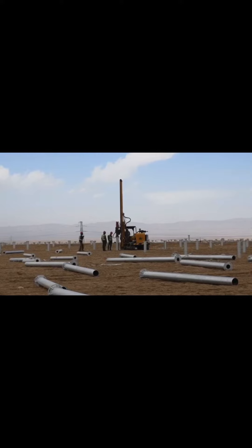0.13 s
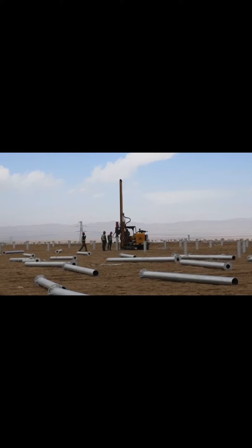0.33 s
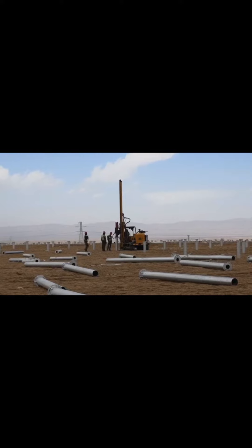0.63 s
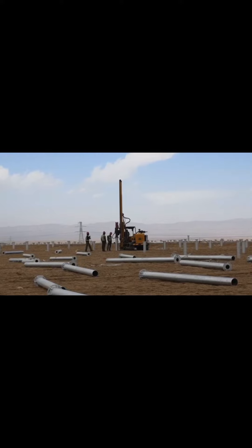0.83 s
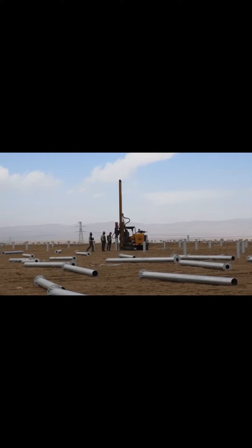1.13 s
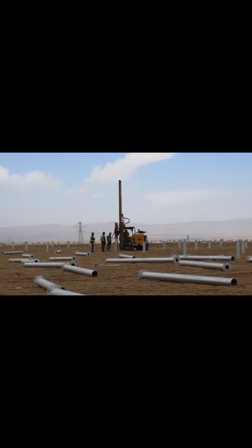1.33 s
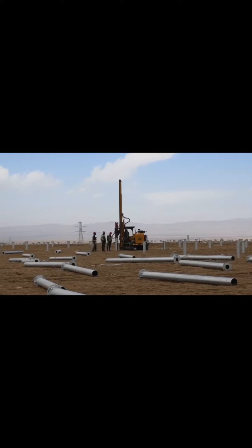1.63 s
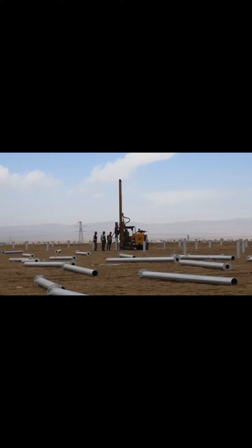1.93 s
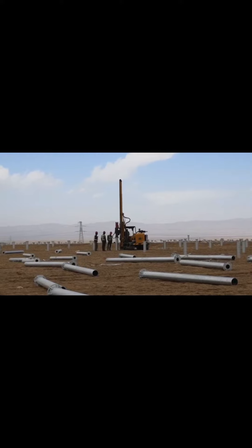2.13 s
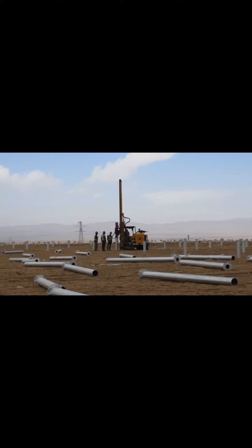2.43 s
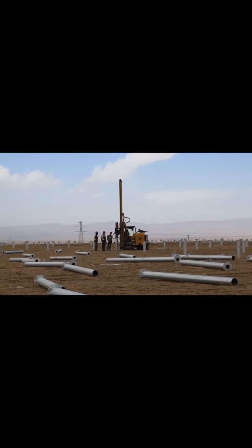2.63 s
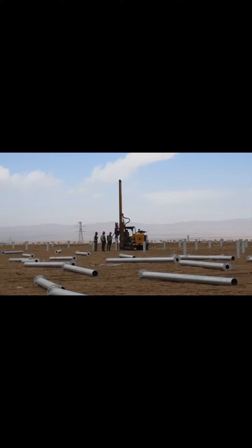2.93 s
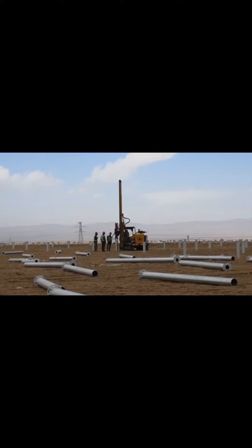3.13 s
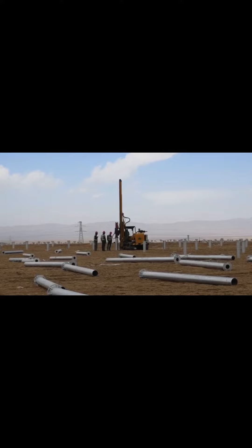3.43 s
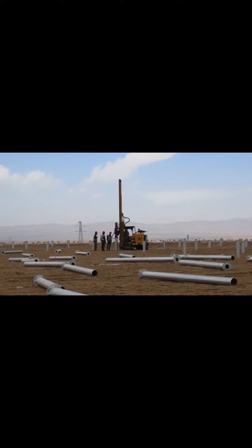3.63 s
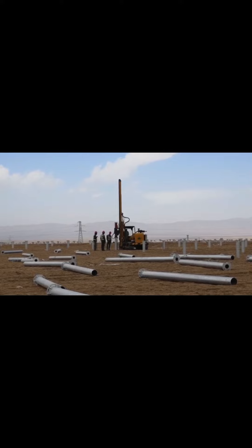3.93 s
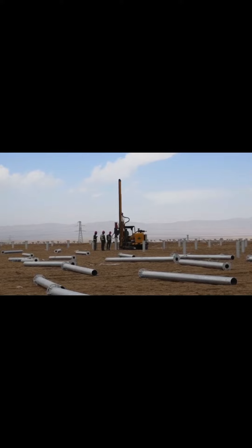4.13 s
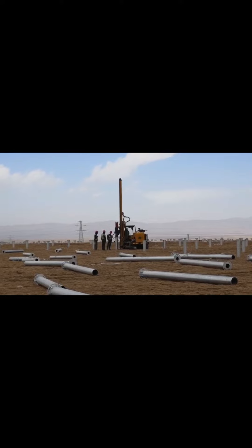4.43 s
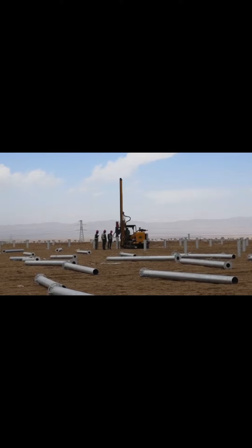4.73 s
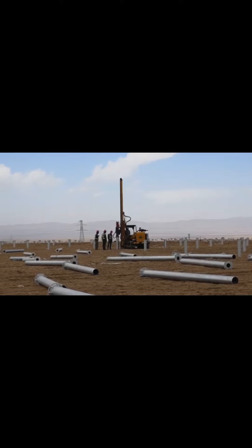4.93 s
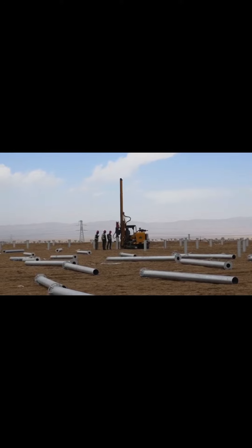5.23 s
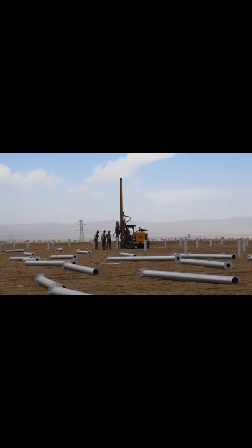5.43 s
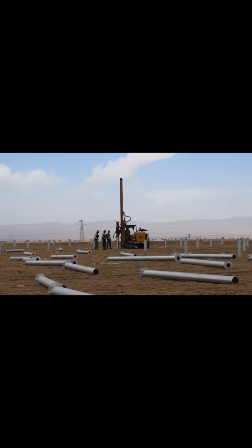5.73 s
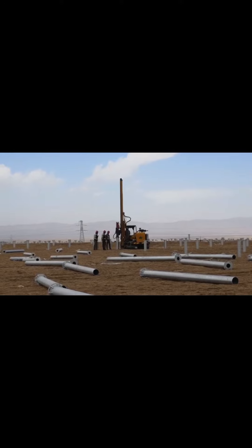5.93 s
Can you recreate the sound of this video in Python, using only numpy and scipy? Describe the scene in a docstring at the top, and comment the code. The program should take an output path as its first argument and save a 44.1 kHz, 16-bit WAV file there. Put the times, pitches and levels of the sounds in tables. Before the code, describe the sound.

Fast machine-gun-like steel clanging from a rig across an open field, faint engine hiss behind it, low wind thumping on a small camera's microphones.

```python
"""Pile driver across a windy field

Far across an open field a hydraulic hammer strikes a steel tube nearly ten times a second; its engine hisses.
A valve ticks just before each blow. Tube and valve are sums of decaying modes; clatter, echoes and engine are
shaped noise. Wind buffets the two microphone ports of a small camera: three bands of noise, swelling in gusts.
The microphone overloads softly and cuts the extreme treble."""
import sys
import numpy as np
from scipy import signal
from scipy.fft import irfft
from scipy.io import wavfile
from scipy.ndimage import uniform_filter1d

SR = 44100
rng = np.random.default_rng(int(sys.argv[2]) if len(sys.argv) > 2 else 0)


def transcribe(u):
    """Save the signal u as a 16-bit wav file named by the first command-line argument.

    u: samples, shape (n,) or (channels, n), limited to [-1, 1]; the rate is SR.
    q: integer samples, one column per channel.
    """
    v = np.clip(np.atleast_2d(u).T, -1, 1)
    q = np.round(v * 32767).astype(np.int16)
    wavfile.write(sys.argv[1], SR, q)


N = 268348


def gain_of(db):
    """dB to amplitude."""
    return 10 ** (np.asarray(db) / 20)


def evened(x):
    """Scales to rms 1."""
    return x / np.sqrt(np.mean(x ** 2) + 1e-20)


def read(points, hz, column=1):
    """Reads a table along log frequency."""
    points = np.transpose(points)
    return np.interp(np.log(hz + 1), np.log(points[0] + 1), points[column])


def wavering(seconds):
    """Slow random drift of rms 1, smoothed twice over the given time."""
    span = max(round(seconds * SR), 2)
    once = uniform_filter1d(rng.standard_normal(N), span)
    return evened(uniform_filter1d(once, span))


def pair_noise(spectrum, ports, balance_db, lead):
    """Partly alike noise at two microphone ports; the mean of both has rms 1."""
    hz = np.fft.rfftfreq(N, 1 / SR)
    a, b, c, d = rng.standard_normal((4, len(hz)))
    same = np.clip(ports(hz), -1, 1)
    right = a + 1j * b
    # the left port shares part of the right port's noise, turned by its lead
    left = (same * right + np.sqrt(1 - same ** 2) * (c + 1j * d)) * np.exp(1j * lead)
    both = np.array([left * gain_of(balance_db / 2), right * gain_of(-balance_db / 2)])
    pair = irfft(both * gain_of(read(spectrum, hz)), N)
    return pair / np.sqrt(np.mean(pair.mean(0) ** 2))


# how the two ports hear the distant machine: f/Hz, left-right level/dB, left lead/rad, likeness/0-1
PORTS = [(700, 0, 0, .6), (1300, -4, .2, .9), (2000, -8, .5, .9), (2600, 1.5, 1.1, .8), (3200, 0, 1.5, .7),
         (4100, 4, 3.7, .7), (4600, 5, 5.7, .6), (5600, 8, 8.1, .5), (6200, 6, 6.9, .5),
         (8000, 12, 7.8, .5), (9000, 2.5, 8.3, .5), (10500, 0, 9.4, .45)]


def far_noise(spectrum):
    """Noise from the distant machine: level, phase and likeness at the two ports vary with frequency."""
    hz = np.fft.rfftfreq(N, 1 / SR)
    balance_db, lead = read(PORTS, hz), read(PORTS, hz, column=2)
    return pair_noise(spectrum, lambda f: read(PORTS, f, column=3), balance_db, lead)


# spectrum shape of the engine hiss at the microphone: f/Hz, relative level/dB per Hz
ENGINE = [(350, -40), (600, -19.5), (1150, -12.5), (1400, -8.5), (1780, -9.5), (2080, -4.5), (2420, -12.5),
          (2900, -8.5), (3350, -25), (3700, -23), (4050, -8.5), (4320, -23.5), (4700, -20), (5700, -31),
          (7850, -26), (9000, -39), (12000, -44.5), (16000, -58)]


def engine():
    """Steady hiss behind the blows: noise in the engine's spectrum, heard from far off."""
    return gain_of(-49.5) * far_noise(ENGINE)


# wind at the two ports: f/Hz, likeness/0-1, left lead/rad
SAME = [(25, .98, -.15), (60, .96, -.2), (107, .8, 0), (150, .66, .4), (215, .5, .9), (300, .5, 1.9),
        (430, .64, 2.8), (600, .66, 3.1), (900, .5, 3.3)]


def port_wind(spectrum, balance_db):
    """Large eddies are alike at both ports; small ones differ more and reach one port first."""
    hz = np.fft.rfftfreq(N, 1 / SR)
    return pair_noise(spectrum, lambda f: read(SAME, f), balance_db, read(SAME, hz, column=2))


# wind strength before gusts and lumps: t/s, rumble level/dB, buffeting level/dB, flutter level/dB
WIND = [(0.1, -14.5, -27.5, -45), (0.28, -18, -21.5, -46), (0.43, -24, -28.5, -58), (0.49, -15, -23, -44.5),
        (0.76, -20, -25.5, -46.5), (0.84, -9, -21.5, -42), (0.9, -18.5, -22, -41), (1.32, -18, -25, -44),
        (1.46, -12.5, -22, -43.5), (1.58, -23.5, -30, -43), (1.59, -10, -25, -40),
        (1.92, -23.5, -22, -37.5), (2.02, -15, -20.5, -34.5), (2.24, -13, -23, -36.5),
        (2.48, -19, -25, -41.5), (2.51, -11.5, -18.5, -36.5), (2.63, -16.5, -23.5, -39.5),
        (2.76, -13, -22, -36.5), (3.65, -15, -22, -40), (3.93, -19.5, -28.5, -48.5),
        (4.03, -14.5, -20, -39.5), (4.21, -13.5, -21, -38.5), (4.47, -14.5, -24, -43.5),
        (4.82, -20.5, -29, -45.5), (4.85, -9.5, -15.5, -36), (4.93, -17, -35, -43),
        (4.98, -11, -17.5, -34.5), (5.16, -17, -22.5, -36), (5.85, -11.5, -22, -38),
        (6.0, -20.5, -15.5, -31.5)]
# spectrum shapes of the wind, large eddies to small: f/Hz, relative level/dB per Hz
RUMBLE = [(5, -13), (15, -0.5), (30, 4.5), (55, 8), (80, 2), (130, -5.5), (300, -51), (2000, -140)]
BUFFET = [(30, -2.5), (80, -18.5), (120, -5), (170, -5.5), (250, -12), (400, -23), (800, -97), (4000, -130)]
FLUTTER = [(100, -20), (250, 3.5), (400, 2.5), (560, -4), (800, -11), (1150, -23), (2500, -59.5),
           (8000, -120)]


def wind():
    """Eddies at the microphone: rumble swells with the gusts, buffeting and flutter also come in lumps."""
    s, *curves = np.transpose(WIND)
    t = np.arange(N) / SR
    rumble_db, buffet_db, flutter_db = (np.interp(t, s, curve) for curve in curves)
    lumps, spikes, gusts = wavering(0.011), wavering(0.0055), wavering(0.036)
    rumble_db = rumble_db + 0.93 * gusts
    buffet_db = buffet_db + 2.43 * lumps + 0.8 * gusts
    flutter_db = flutter_db + 2.03 * lumps + 3.1 * spikes + 2.22 * gusts
    rumble = port_wind(RUMBLE, balance_db=0) * gain_of(rumble_db)
    buffet = port_wind(BUFFET, balance_db=.4) * gain_of(buffet_db)
    flutter = port_wind(FLUTTER, balance_db=1.2) * gain_of(flutter_db)
    return rumble + buffet + flutter


def decays(times, db, t60, rise):
    """Envelope: every event swells with time constant `rise` (s) while dying 60 dB in t60 (s)."""
    kicks, t = np.zeros(N), np.arange(SR // 2) / SR
    kicks[np.round(times * SR).astype(int)] = gain_of(db)
    return signal.oaconvolve(kicks, (1 - np.exp(-t / rise)) * gain_of(-60 * t / t60))[:N]


def strike(modes, times, db, scatter_db, slip, rise, hold):
    """Every hit rings all modes from scattered level and phase (slip, rad); after `hold` s the body is gripped."""
    hz, mode_db, t60, balance_db, lead = np.transpose(modes)[:, :, None]
    t, out = np.arange(SR // 8) / SR, np.zeros((2, N + SR))
    side = np.array([.5, -.5])[:, None, None]  # left, right
    grip_db = -750 * np.maximum(t - hold, 0)  # extra decay of 750 dB a second
    shape = gain_of(mode_db + side * balance_db - 60 * t / t60 + grip_db) * (1 - np.exp(-(t / rise) ** 2))
    swing = shape * np.exp(1j * (2 * np.pi * hz * t + side * lead))
    chance = rng.standard_normal((len(times), 2, len(modes)))
    for s, hit_db, (up, turn) in zip(times, db, chance):
        start = gain_of(hit_db + scatter_db * up) * np.exp(1j * slip * turn)
        out[:, round(s * SR):][:, :len(t)] += (start @ swing).imag
    return out[:, :N]


# one row a blow, in order: strength level/dB, long ring level/dB, upper ring level/dB, treble level/dB,
# valve tick level/dB; long ring, upper ring and treble are relative to the strength
BLOWS = [(-16.5, 4, -4, 2, -64), (-18.5, 6.5, 7.5, 6.5, -43), (-14.5, 0.5, -7, -2, -51),
         (-8.5, 0.5, 2, -1.5, -44.5), (-8, 5, -3, -4.5, -41), (-8, 0, -10, -4, -52),
         (-9, -1.5, 6, -1.5, -43.5), (-11, 1.5, 1, -3, -60), (-16.5, 1.5, 3, 2, -60),
         (-15, -0.5, 4, 3.5, -54), (-13.5, 4, 5, -2, -54), (-8, -1, -1.5, 0.5, -44),
         (-12.5, -0.5, 8.5, 3, -45), (-10.5, 1, -2, -5.5, -52), (-13.5, 5, 4, 3, -51), (-15, 3, -2, 0, -49),
         (-9.5, 3.5, 6, 3.5, -41.5), (-7, -7, 0, -3.5, -47), (-8.5, -1.5, -9, -2, -52),
         (-9.5, -2, -7, -3, -50), (-8, 2, -8, 4, -39), (-9.5, 1, -3, -0.5, -52), (-9, -2, -1, -0.5, -54),
         (-11, -3, 7.5, -1, -49), (-15, -2, -3, 3.5, -51), (-11.5, 0, -2, -5, -62),
         (-11.5, 2, -1, 1.5, -51), (-12, -4, -3, 0.5, -53), (-16.5, 3, 5, 1, -71),
         (-17.5, 1.5, -6.5, 0, -62), (-13.5, 1, -6, -3, -58), (-13, 4.5, -3, 2.5, -50),
         (-13.5, 7.5, 5, 4.5, -44), (-12, -12, -19, -6, -56), (-11.5, 1.5, 1, -7.5, -59),
         (-8.5, -7, -14, -0.5, -47), (-10.5, -21, 2, -3.5, -50), (-10, 1, -4, -8.5, -51),
         (-11, 1.5, -1, -2, -48), (-13, 0, 6, 2.5, -46), (-12.5, 0, -13, -2, -68),
         (-11.5, 0.5, 7, 0.5, -60), (-10.5, -4.5, -15, -4.5, -60), (-12, 3, 0, -3, -54),
         (-10, -4, -24, -3, -48), (-10.5, 2, -7, 1.5, -53), (-12, 4.5, 2, -2, -52),
         (-8, -4, -19, -8.5, -52), (-9.5, 4.5, -6, -6, -51), (-9, 0, -3, -2, -58.5), (-13, 2, 2, 2, -57),
         (-12, 2.5, -13, -4, -54), (-10.5, 2.5, -5, -5.5, -54), (-12.5, 0.5, -3, -6, -60),
         (-13, 7.5, -13, 1, -51), (-11.5, 4, -2, 0.5, -56), (-22, 7, 8, 8, -48), (-10.5, 3, -2, 0.5, -42)]
FIRST_S, STROKE_S = .0463, .10449  # first blow and time between blows


def strokes():
    """Even times of the blows, before any jitter."""
    return FIRST_S + STROKE_S * np.arange(len(BLOWS))


# valve body modes: f/Hz, level/dB relative to the tick, t60/s, left-right level/dB, left lead/rad
VALVE = [(2000, 6, .03, -8, .5), (3350, -3, .018, -5, 1.5), (3750, -8, .015, -4, 2.5),
         (4400, -6, .015, 5, -.5), (5500, -9, .015, 8, 1.5), (6770, -5, .025, 10, 1.2),
         (7100, -8, .02, 8, 1.5), (8000, -9, .02, 12, .9), (10770, -10, .04, 0, 3.1),
         (14000, -24, .03, 6, 3.1)]


def valve():
    """A small bright tick ahead of each blow: short modes of the valve body with a puff of noise."""
    s = strokes() - .0263  # lead over the even stroke, s
    db = np.transpose(BLOWS)[-1]
    ticks = strike(VALVE, s, db, scatter_db=4.0, slip=0.53, rise=0.0008, hold=.03)
    puff = far_noise([(2000, -8), (4000, 3), (8000, -11.5), (11000, -10.5), (15000, -24.5)])
    return ticks + puff * decays(s, db + 1, t60=0.046, rise=0.00066)


# tube and hammer, one list a family: main clang, low clang, beating cluster, long ring, upper ring, whistle,
# treble; rows: f/Hz, level/dB relative to the hit, t60/s, left-right level/dB, left lead/rad
TUBE = [
    [(1857, -14, .05, -5, .2), (2070, -5, .05, -9, .6), (2160, -10, .06, -5, .8), (2280, -9, .035, -3, 1.1),
     (2551, -22, .06, 1, 1.1), (2750, -17, .04, 1.5, .8), (2870, -15, .05, 0, .7), (2855, -36, .2, 0, .7)],
    [(1022, -38, .25, 0, .3), (1367, -16, .05, -3, .3), (1450, -16, .04, -3, .3), (1545, -32, .25, -4, .1),
     (1680, -14, .04, -4, 0)],
    [(1938, -26, .35, -9, .35), (1985, -33, .3, -9, .5), (2036, -31, .3, -11, .6), (2072, -30, .3, -9, .6)],
    [(3093, -14, .11, -1, 1.55), (3101, -30, .6, -1, 1.55)],
    [(4040, -17, .06, 4, -2.5), (4020, -32, .2, 4, -2.5), (4085, -30, .15, 5, -2.4),
     (4150, -35, .15, 4, -2.1), (4900, -36, .04, 4, .4)],
    [(4533, -45, .7, 5, -.6), (6190, -57, .3, 5, .7)],
    [(7500, -40, .04, 10, 1.8), (7870, -42, .1, 10, 2.1), (8055, -31, .065, 14, .9),
     (8030, -49, .2, 14, .9), (8090, -51, .25, 14, .9)],
]
# time constant of each family's swell: t/s
RISES = [0.0015, 0.0006, 0.0028, 0.0036, 0.0019, 0.0083, 0.0019]
# slow drift as the tube goes down: t/s, low clang level/dB, beating cluster level/dB, whistle level/dB
DRIFT = [(0, 3.5, -3, -6), (.6, 1, -4, -4), (1.5, -6, -4.5, -14), (2.3, -0.5, -3, 2.5), (3, 1, -4, -5),
         (3.6, 1, 0, 3), (4.2, 0, -3.5, -1), (4.9, -2.5, 2.5, 3.5), (6.1, 3, -7, -2)]
# for those three families: share of a blow's extra strength they follow
FOLLOWS = [.45, 0.26, .3]
# for those three families: blow-to-blow scatter, level/dB
SCATTERS = [1.63, 2.2, 3.7]
USUAL_DB = -11.5  # strength of a middling blow


def tube(s, strength, ring, upper, bright):
    """Each blow rings seven families of steel modes; gusty air on the long path makes each family flicker."""
    at, *drifts = np.transpose(DRIFT)
    loose_db = []
    for share, drift, spread in zip(FOLLOWS, drifts, SCATTERS):
        followed = USUAL_DB + share * (strength - USUAL_DB)
        loose_db.append(followed + np.interp(s, at, drift) + spread * rng.standard_normal(len(s)))
    low, cluster, whistle = loose_db
    levels = [strength, low, cluster, strength + ring, strength + upper, whistle, strength + bright]
    out = 0
    for modes, db, rise in zip(TUBE, levels, RISES):
        rings = strike(modes, s, db, scatter_db=0.76, slip=1.0, rise=rise, hold=0.077)
        out = out + rings * gain_of(1.9 * wavering(0.0046))
    return out


# spectrum shape of loose steel rattling after a blow: f/Hz, relative level/dB per Hz
CLATTER = [(600, -13.5), (1100, -14.5), (1400, 0.5), (2100, -3.5), (3000, 0.5), (3600, -11.5), (4200, -7.5),
           (5500, -20), (8000, -18.5), (9000, -25), (12000, -38.5), (16000, -46.5)]


def clatter(s, strength, bright):
    """Loose steel rattles in grains after each blow; above 5 kHz it follows the blow's treble too."""
    rattle = far_noise(CLATTER) * gain_of(3.4 * wavering(0.001))
    body = signal.sosfiltfilt(signal.butter(3, 5000, fs=SR, output="sos"), rattle)
    treble = (rattle - body) * decays(s, strength + bright - 14, t60=0.066, rise=0.0012)
    return body * decays(s, strength - 14, t60=0.065, rise=0.0022) + treble


# spectrum shape of what the site throws back: f/Hz, relative level/dB per Hz
ECHOES = [(600, -12.5), (1100, -15), (1500, -7.5), (2050, -11.5), (3000, -21.5), (3600, -21), (4050, -15),
          (4320, -26), (4700, -13.5), (5500, -27), (8000, -41.5), (9000, -43.5), (11000, -51.5),
          (16000, -61)]


def echoes(s, strength):
    """The site answers each blow with wavering noise that dies more slowly than the clatter."""
    answer = far_noise(ECHOES) * gain_of(3.8 * wavering(0.0059))
    return answer * decays(s, strength - 28, t60=0.13, rise=0.0013)


def hammer():
    """Slightly uneven blows ring the tube, rattle loose parts and rouse the site."""
    strength, ring, upper, bright, _ = np.transpose(BLOWS)
    s = strokes() + .0004 * rng.standard_normal(len(BLOWS))  # jitter, s
    return tube(s, strength, ring, upper, bright) + clatter(s, strength, bright) + echoes(s, strength)


def scene():
    """Machine far off across the field, wind at the microphone."""
    return engine() + wind() + valve() + hammer()


DRIVE_DB, CEILING = 2, .97  # microphone gain ahead of the overload; full-scale fraction it bends towards
EDGE_HZ = 15400  # upper edge of the band


def record(dry):
    """The microphone bends the largest swings softly, then a low-pass limits the band."""
    soft = CEILING * np.tanh(gain_of(DRIVE_DB) * dry / CEILING)
    low_pass = signal.firwin(511, EDGE_HZ, window=("kaiser", 9), fs=SR)
    return signal.oaconvolve(soft, low_pass[None], "same")


dry = scene()
out = record(dry)
transcribe(out)
```